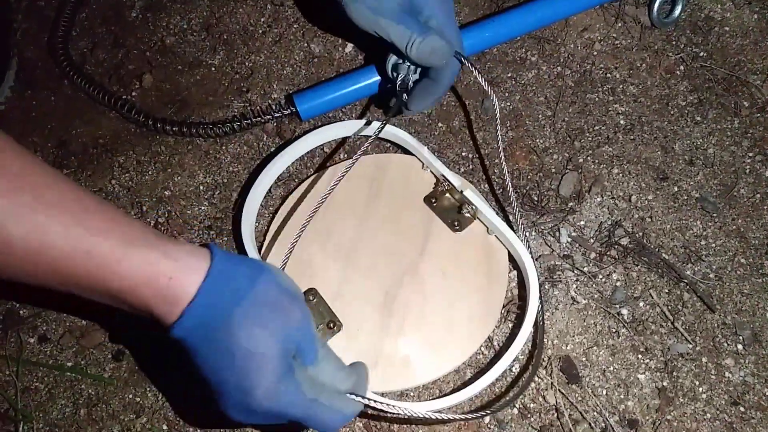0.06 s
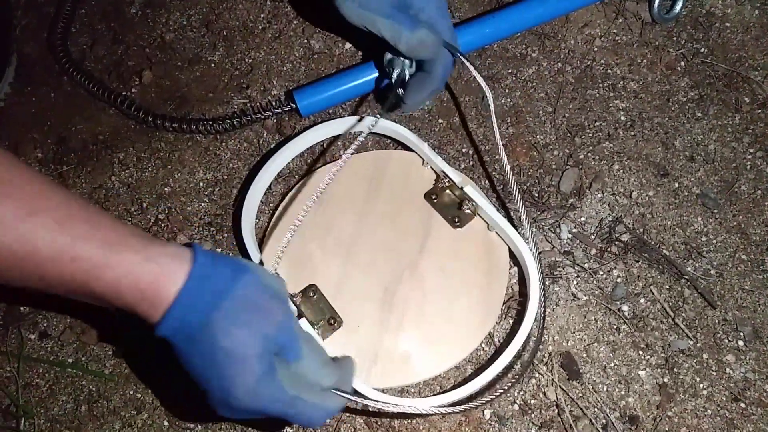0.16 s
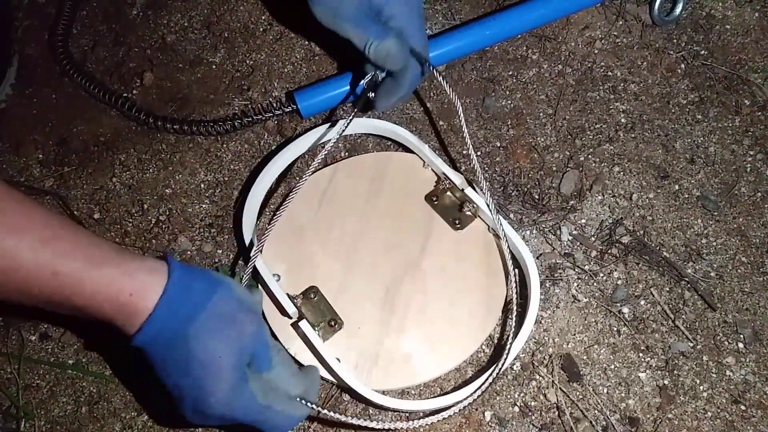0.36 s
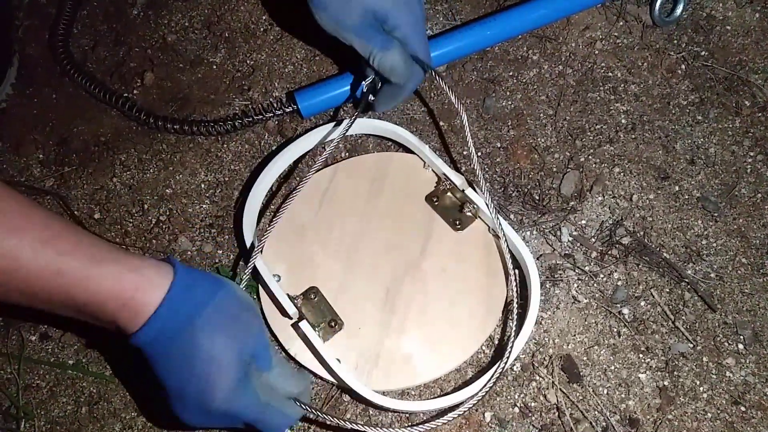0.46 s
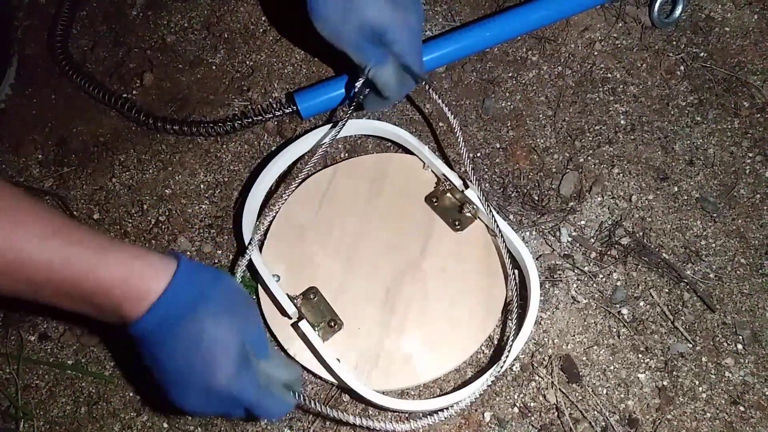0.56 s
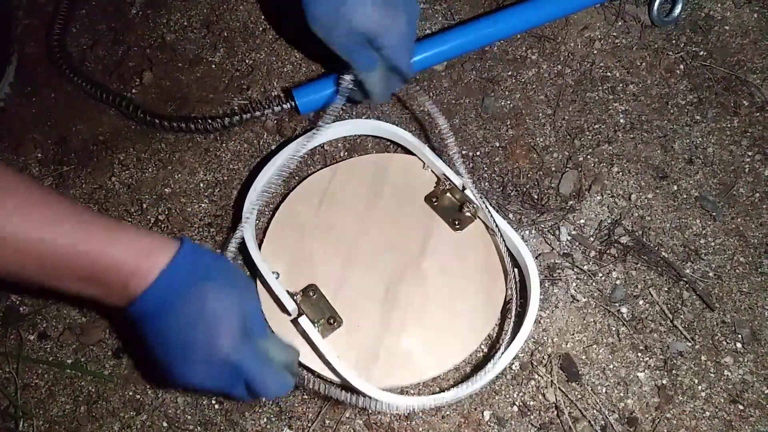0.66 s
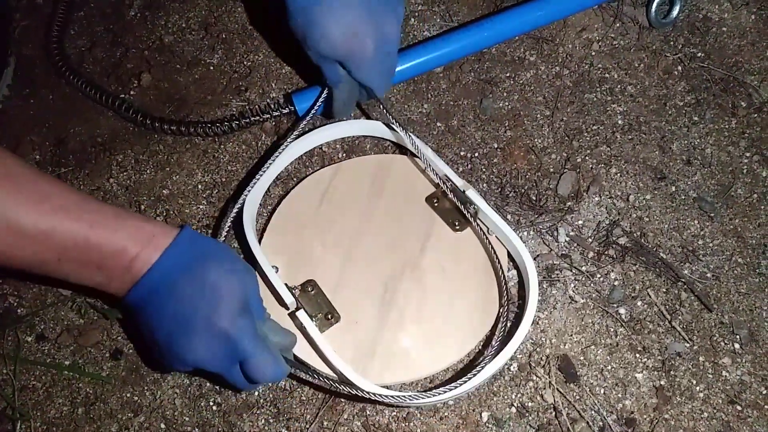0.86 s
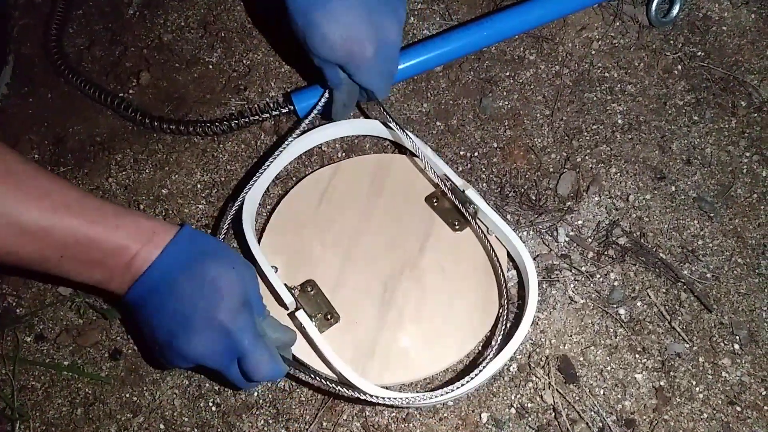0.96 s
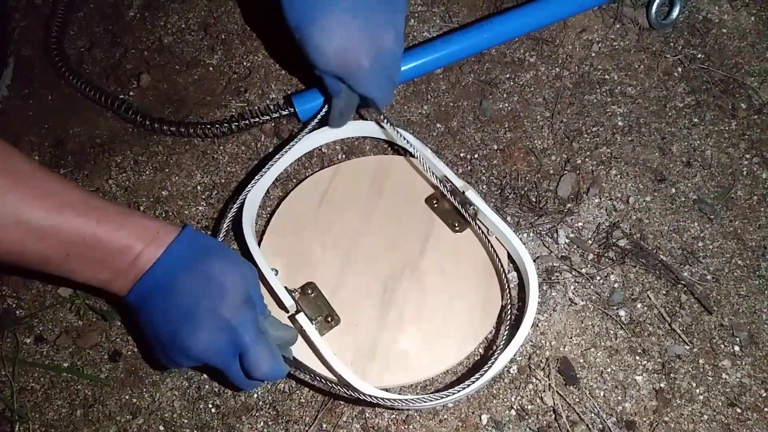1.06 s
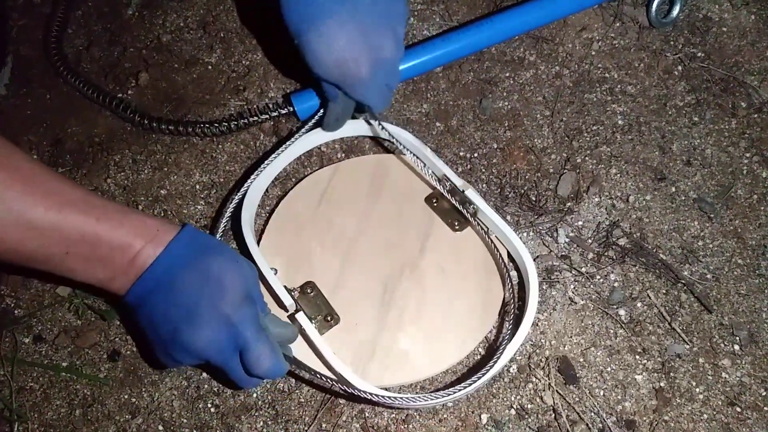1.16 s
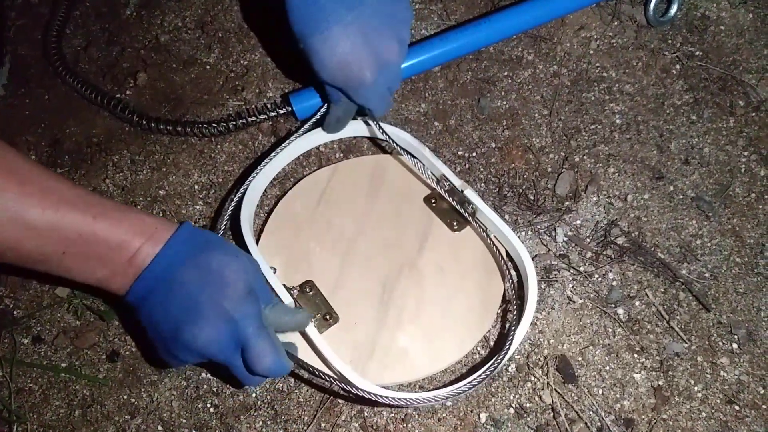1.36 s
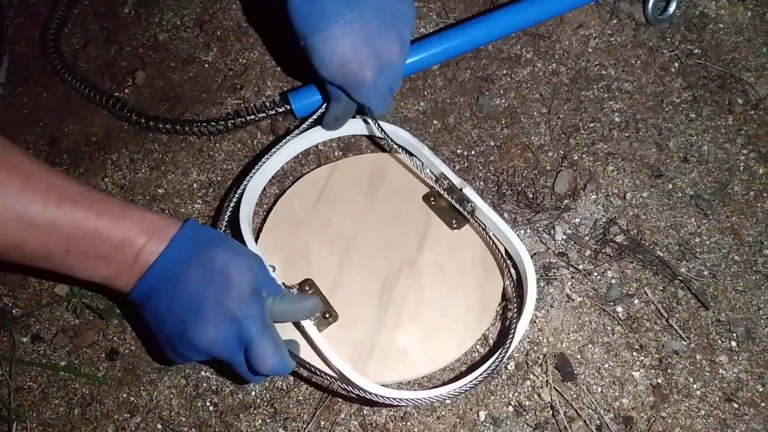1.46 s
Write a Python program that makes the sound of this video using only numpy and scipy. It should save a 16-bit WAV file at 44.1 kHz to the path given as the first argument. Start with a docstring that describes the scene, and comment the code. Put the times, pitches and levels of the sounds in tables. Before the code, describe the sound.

A steel cable ticks, scrapes and clacks against a trap's hoop, close by outdoors.

```python
"""Outdoors, over a low rush of air, gloved hands pull a stranded steel cable round the hoop of a
wooden-panned trap, close by. From 0.1 s the cable scrapes and ticks over the rim, and the frame knocks
lightly. Near 0.8 s the cable snaps into place with hard clacks. Then the frame knocks louder as it
settles. The ground returns a faint tail after each tick, knock and clack."""
import sys
import numpy as np
from scipy import signal
from scipy.fft import rfft, irfft, next_fast_len
from scipy.io import wavfile

SR = 44100
rng = np.random.default_rng(int(sys.argv[2]) if len(sys.argv) > 2 else 0)


def put_to_file(sound):
    """Save the sound as 16-bit audio at rate SR, in the file named by the first command-line argument."""
    columns = np.atleast_2d(sound).T  # one column per channel
    safe = np.clip(columns, -1, 1)
    whole_steps = np.round(safe * 32767)
    wavfile.write(sys.argv[1], SR, whole_steps.astype(np.int16))


N = 66150

# The tone of the noisy crack in ticks and knocks. Each row: frequency in Hz, relative level in dB.
SOFT_CRACK_COLOUR = [(150, -33), (300, 1), (570, -20), (800, 8), (1200, 8.5), (1500, -11), (2200, 3),
                     (4600, 3), (5800, -11.5), (9000, -21), (16000, -41)]


def amp(db):
    """Turn decibels into a gain."""
    return 10 ** (np.asarray(db) / 20)


def unit(x):
    """Scale a sound to an average (rms) level of 1."""
    return x / np.sqrt(np.mean(x ** 2) + 1e-20)


def coloured(x, colour):
    """Shape a sound's lows and highs with (Hz, dB) points, then scale it to level 1."""
    hz, db = np.transpose(colour)
    freqs = np.fft.rfftfreq(len(x), 1 / SR)
    gains = amp(np.interp(np.log(freqs + 1), np.log(hz), db))
    return unit(irfft(rfft(x) * gains, len(x)))


def add(track, start_s, sound):
    """Mix a sound into the track at its start time."""
    part = track[max(round(start_s * SR), 0):][:len(sound)]
    part += sound[:len(part)]


def drifting_noise(levels, colour):
    """Noise of one tone whose level slowly follows (seconds, dB) points."""
    times, db = np.transpose(levels)
    return amp(np.interp(np.arange(N) / SR, times, db)) * coloured(rng.standard_normal(N), colour)


def outdoor_air():
    """A soft rush and a distant rumble, both wavering as they slowly fade."""
    # The tone of each noise. Each row: frequency in Hz, relative level in dB.
    rush_colour = [(200, -12.5), (400, -1.5), (575, -4), (840, 0.5), (1200, -1.5), (1500, -6.5), (2220, -8),
                   (2800, -9), (3160, -13), (3500, -10), (4200, -11.5), (5300, -19.5), (14000, -27),
                   (16000, -31)]
    rumble_colour = [(25, -9), (70, -27), (110, -15), (160, -1.5), (235, 4), (320, -2), (500, -12),
                     (900, -45.5)]
    # How loud each noise is. Each row: time in seconds, relative level in dB.
    rush_levels = [(0.0, -48), (0.37, -51), (0.802, -51), (1.232, -56), (1.39, -54.5), (1.5, -60)]
    rumble_levels = [(0.0, -48.5), (0.104, -54), (0.392, -52.5), (0.508, -56), (0.572, -50), (1.432, -61.5),
                     (1.5, -56)]
    rush = amp(1) * drifting_noise(rush_levels, rush_colour)
    return rush + drifting_noise(rumble_levels, rumble_colour)


def cable_scrapes(slips_per_s=2000, spread_db=3, hiss=0.6, edge_s=0.0053):
    """The cable's strands catch on the rim in a dense, uneven run of tiny slips."""
    # The cable's drags. Each row: start in seconds, length in seconds, level in dB.
    drags = [(0.096, .16, -52.5), (0.201, 0.016, -31), (0.333, 0.044, -36.5), (0.377, 0.039, -46),
             (0.626, 0.116, -49.5), (0.761, 0.0514, -29.5), (0.776, 0.026, -26), (0.837, 0.011, -24.5),
             (1.111, 0.034, -38), (1.344, 0.029, -60)]
    # The tone of a drag. Each row: frequency in Hz, relative level in dB.
    drag_colour = [(300, -15), (580, -18.5), (770, 12.5), (1200, 5), (1480, 2.5), (2150, 6), (2650, -7.5),
                   (3170, 8), (3600, -2.5), (4500, -12), (5800, -15.5), (15000, -34)]
    out, t = np.zeros(N), np.arange(N) / SR
    for start, length, db in drags:
        slips = (rng.random(N) < slips_per_s / SR) * rng.choice([-1, 1], N)
        slips = slips * amp(spread_db * rng.standard_normal(N))
        friction = coloured(unit(slips) + hiss * rng.standard_normal(N), drag_colour)
        fade_in = np.clip((t - start) / edge_s, 0, 1)
        fade_out = np.exp(-np.maximum(t - start - length, 0) / edge_s)
        out += amp(db) * fade_in * fade_out * friction
    return out


def with_ground_tail(sound, fade_s=0.087, tail_db=-19.5):
    """The ground scatters a sound back, adding a faint tail."""
    t = np.arange(SR // 6) / SR
    tail = rng.standard_normal(len(t)) * amp(-60 * t / fade_s) * (1 - np.exp(-t / 0.0013))
    return sound + amp(tail_db) * signal.fftconvolve(sound, tail / np.linalg.norm(tail))[:len(sound)]


def strikes(hits, tones, colour, ring_db, noise_db, rise_s, crack_fade_s, crack_rise_s, lag_s):
    """Each hit rings a set of fading tones under a short crack. Sharper hits brighten both."""
    # Each row of hits: start in seconds, relative level in dB, brightness in dB per octave,
    # extra crack in dB.
    # Each row of tones: frequency in Hz, relative level in dB, seconds to fade by 60 dB.
    out, t = np.zeros(N), np.arange(SR // 5) / SR
    hz, db, fade_s = np.transpose(tones)[:, :, None]
    age = np.maximum(t - lag_s * (np.sqrt(hz.max() / hz) - 1), 0)  # low tones arrive last
    swell = (1 - np.exp(-(age / rise_s) ** 2)) * amp(-60 * age / fade_s)
    crack_shape = amp(-60 * t / crack_fade_s) * (1 - np.exp(-t / crack_rise_s))
    for start, level_db, bright_db, crack_db in hits:
        scatter_db, detune, phase = rng.standard_normal((3, len(hz), 1))  # no two hits are alike
        gains = amp(db + bright_db * np.log2(hz / 2000) + scatter_db)
        waves = np.sin(2 * np.pi * hz * (1 + 0.004 * detune) * age + 0.25 * phase)
        ring = np.sum(gains / np.linalg.norm(gains) * swell * waves, axis=0)
        tilted = [(f, d + bright_db * np.log2(max(f, 1200) / 2000)) for f, d in colour]
        crack = coloured(rng.standard_normal(len(t)), tilted) * crack_shape
        hit = amp(ring_db) * ring + amp(noise_db + crack_db) * crack
        add(out, start, with_ground_tail(amp(level_db) * hit))
    return out


def rim_ticks():
    """The cable ticks over the rim, which rings briefly."""
    # The ticks and the rim's tones, with rows as in strikes().
    tick_hits = [(.1028, -27, 2, 5.5), (.1140, -32.5, 13, -16), (.1470, -32, 4, -11), (.1532, -34.5, 1, 6),
                 (.1868, -35.5, 3, 15), (.1975, -25.5, -3.5, 7), (.2015, -20, -6.5, 8.5),
                 (.2115, -30.5, -9, 12.5), (.2372, -29.5, 1.5, 2), (.3356, -23, -5, 0),
                 (.3432, -19.5, -2, 3.5), (.3548, -21, -5, 8), (.3675, -23, 7, -1), (.3842, -17, -2, -3),
                 (.4019, -21.5, -1, 5.5), (.4212, -22, -1.5, 2), (.4567, -26.5, -3, -8),
                 (.5174, -20.5, -1, 5), (.5622, -20, -2, 9), (.5990, -17.5, -1, 9.5), (.7545, -27, -12, -7),
                 (.7612, -20.5, -2.5, 4), (.7765, -20.5, 0.5, 11), (.8050, -19.5, 4, 10),
                 (.8218, -26.5, -1, 8), (.9214, -16.5, 0, 3.5), (1.0978, -35, -9, 4),
                 (1.1314, -16.5, -5, 3.5)]
    rim_tones = [(913, -10.5, 0.038), (1123, -8, 0.04), (1210, 0.5, 0.022), (1684, -4, 0.025),
                 (2115, 5, 0.016), (2216, -3.5, 0.033), (3162, 3.5, 0.021), (3174, -0.5, 0.019),
                 (3860, -2.5, 0.0085), (4277, -10, 0.023), (4770, -10.5, 0.012)]
    return strikes(tick_hits, rim_tones, SOFT_CRACK_COLOUR, ring_db=4.5, noise_db=-8,
                   rise_s=0.0015, crack_fade_s=0.017, crack_rise_s=0.0017, lag_s=0.00022)


def frame_knocks():
    """The frame knocks as it settles, and its ring dies very fast."""
    # The knocks and the frame's tones, with rows as in strikes().
    knock_hits = [(.2065, -31.5, 0, 3), (.2982, -26.5, -4.5, 11), (.9210, -16, 0, 0),
                  (1.0228, -30.5, -0.5, 2.5), (1.1724, -22.5, -4, 0.5), (1.2172, -14.5, -2, -0.5),
                  (1.2338, -26, -9, 3), (1.2364, -14.5, -1.5, 1), (1.3064, -18.5, -2.5, -5.5),
                  (1.3980, -40, -4, 8)]
    frame_tones = [(864, -7, 0.023), (980, -13, 0.0087), (1144, -4.5, 0.016), (1700, -11, 0.011),
                   (2111, 7.5, 0.013), (2720, -17, 0.0068), (3130, -32, 0.0097), (3710, -12, 0.009),
                   (4270, -20, 0.0074), (4880, -5.5, 0.012)]
    return strikes(knock_hits, frame_tones, SOFT_CRACK_COLOUR, ring_db=7.5, noise_db=-6.5,
                   rise_s=0.00186, crack_fade_s=0.021, crack_rise_s=0.0018, lag_s=0.00024)


def fitting_clacks():
    """The cable snaps into place and clacks hard against the metal fittings."""
    # The clacks and the fittings' tones, with rows as in strikes().
    clack_hits = [(.7824, -8, 4.5, -17), (.7960, -15, -1, 5), (.8388, -33, -1.5, 4), (.8432, -25, -1.5, 2),
                  (.8471, -9, 1, -6), (1.0037, -24, -2, 6), (1.1160, -28.5, -3.5, 5),
                  (1.3062, -25, -3, 2.5)]
    fitting_tones = [(826.5, -3.5, 0.044), (913, -11.5, 0.034), (1080, -16, 0.028), (1322, -8, 0.047),
                     (1650, -12.5, 0.048), (2112, -1.5, 0.025), (2129, -5, .03), (2712, -6.5, 0.039),
                     (3173, 4, 0.021), (3814, -4, 0.028), (3960, 1, 0.017), (4360, 4.5, 0.019),
                     (4834, 3, 0.014), (6300, -11, 0.021)]
    # The tone of their brighter crack. Each row: frequency in Hz, relative level in dB.
    hard_crack_colour = [(150, -36), (330, 1.5), (580, -21), (800, 2), (1150, 2.5), (1450, 2.5),
                         (2100, 5.5), (2450, -1.5), (4800, -0.5), (5700, -3), (8000, -4), (11000, -13.5),
                         (16000, -10.5)]
    return strikes(clack_hits, fitting_tones, hard_crack_colour, ring_db=4, noise_db=-1,
                   rise_s=0.0015, crack_fade_s=0.02, crack_rise_s=0.00089, lag_s=0.0002)


def scene():
    """Ticks, clacks, knocks and scrapes over the outdoor air, in one channel."""
    return (rim_ticks() + fitting_clacks() + frame_knocks() + cable_scrapes() + outdoor_air())[None]


def record(dry):
    """The small microphone thins the bass and cuts off the very highest treble."""
    low_cut_hz, top_hz = 162, 15900
    thin = signal.sosfilt(signal.butter(2, low_cut_hz, "highpass", fs=SR, output="sos"), dry)
    size = next_fast_len(N + SR // 2)
    below_top = np.fft.rfftfreq(size, 1 / SR) < top_hz
    return irfft(rfft(thin, size) * below_top, size)[..., :N]


dry = scene()
out = record(dry)
put_to_file(out)
```